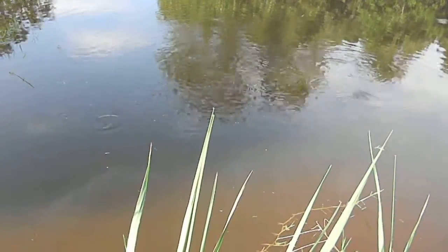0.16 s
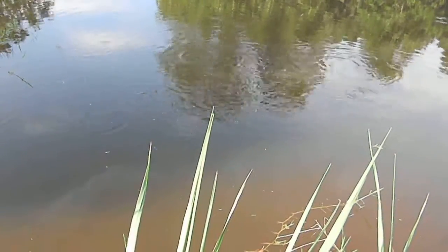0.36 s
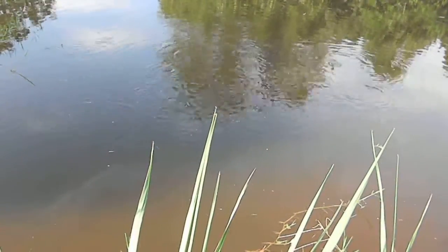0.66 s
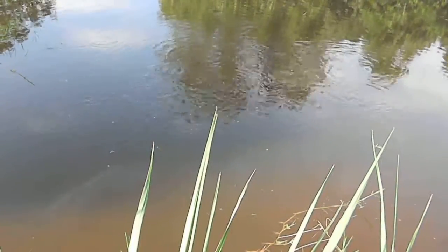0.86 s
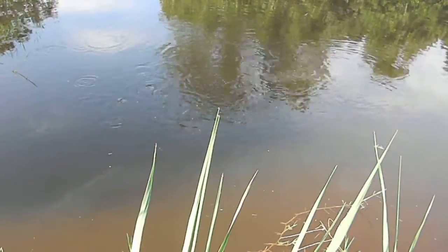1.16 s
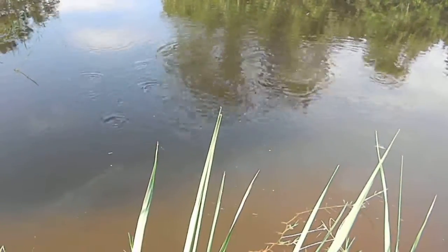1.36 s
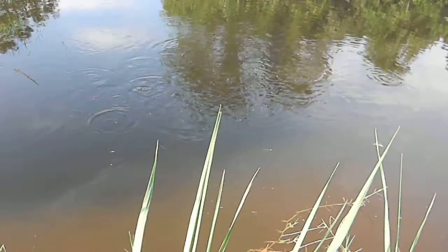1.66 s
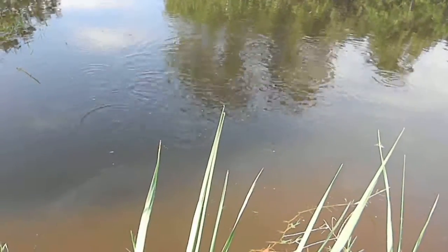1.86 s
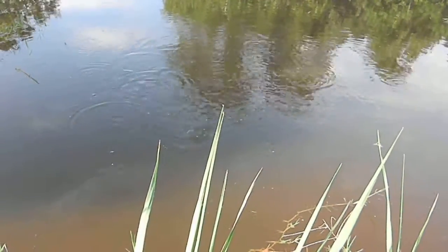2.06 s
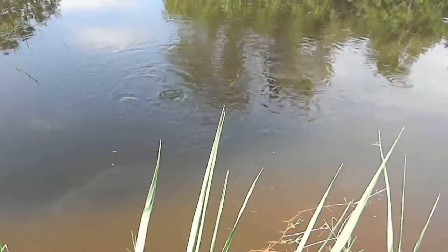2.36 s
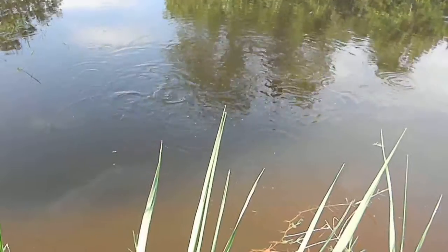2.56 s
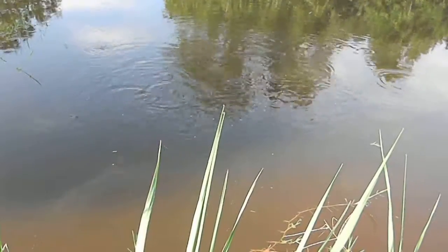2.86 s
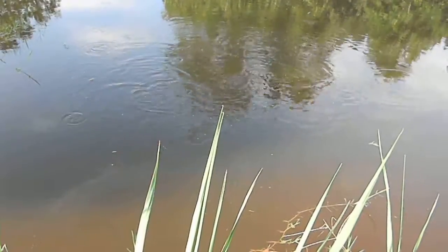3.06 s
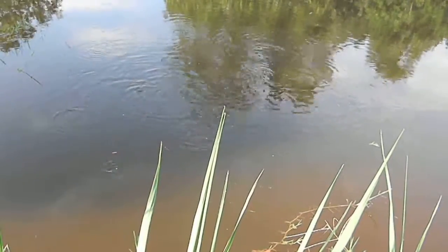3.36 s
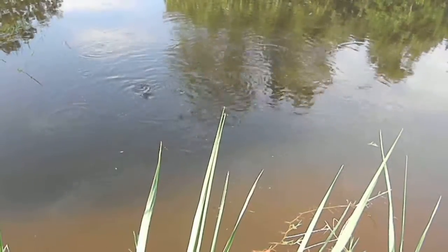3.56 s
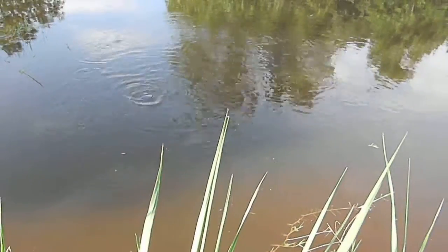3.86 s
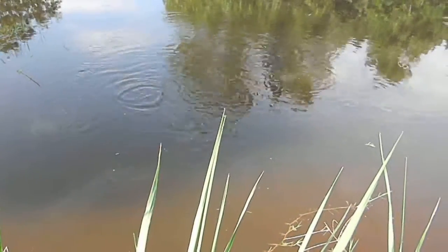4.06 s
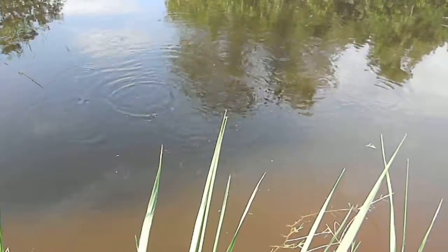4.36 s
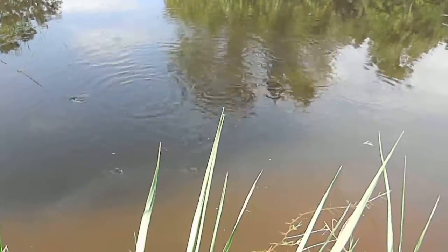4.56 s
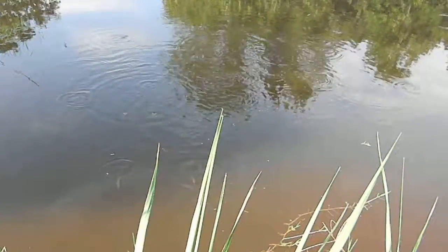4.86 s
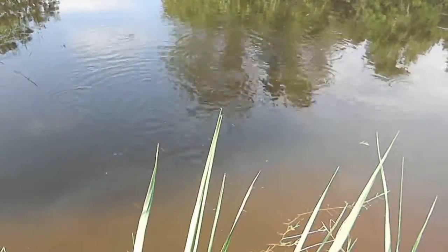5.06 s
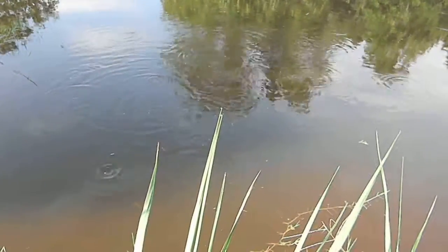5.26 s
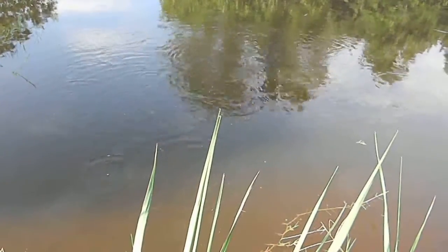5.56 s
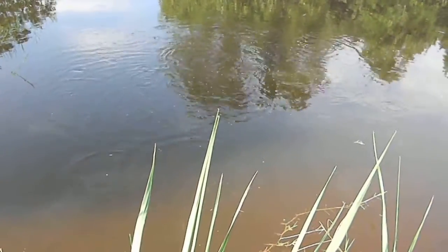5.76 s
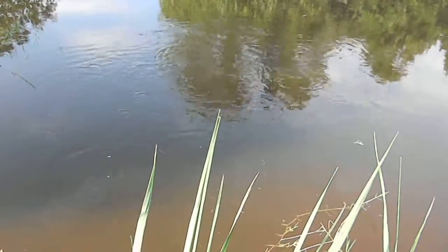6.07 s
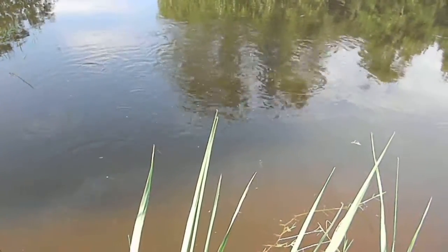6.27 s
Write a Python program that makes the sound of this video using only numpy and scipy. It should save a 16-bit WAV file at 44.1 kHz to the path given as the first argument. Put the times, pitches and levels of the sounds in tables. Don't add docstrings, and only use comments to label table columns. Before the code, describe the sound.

A dense, steady insect chorus, brightest around 3 to 9 kHz with a finer hiss above, fills the air beside a still pond; low traffic rumble swells gently near 0.8, 3 and 5.4 s. A close katydid makes very short, dry, noisy ticks at 0, 0.8, 1.65, 2.4, 3.0, 3.5, 4.0, 4.5, 5.3 and 5.8 s, while a farther one answers faintly. A soft rattle runs until 2.5 s, a fast cricket trill until 1.6 s, and slow chirps from 0.9 s onward. Small tree frogs pulse about twelve times a second throughout. Faint bird whistles glide up around 2.2 s. A thin, very high buzz swells from 2.5 to 5.3 s, then slow ticks follow. One small hard tap sounds at 3.56 s. From 4 s the chorus flutters in step; quick distant bird whistles return from 5.8 s to the end. Mono, no water sounds.

```python
import sys
import numpy as np
from scipy import signal
from scipy.fft import rfft, irfft
from scipy.io import wavfile
from scipy.ndimage import uniform_filter1d

SR = 44100
rng = np.random.default_rng(int(sys.argv[2]) if len(sys.argv) > 2 else 0)


def boost(x):
    u = np.asarray(x, float) / 20
    return 10 ** u


def int16_out(signal):
    q = np.round(np.clip(np.atleast_2d(signal).T, -1, 1) * 32767)
    wavfile.write(sys.argv[1], SR, q.astype(np.int16))


N = 282681
TIME = np.arange(N) / SR


def unit(x):
    return x / np.sqrt(np.mean(x ** 2))


def walk(rate):
    hold = int(SR / rate)
    steps = np.repeat(rng.standard_normal(N // hold + 1), hold)
    return unit(uniform_filter1d(uniform_filter1d(steps, hold), hold)[:N])


def body(x, modes):
    out = 0
    for k, (hz, width, db) in enumerate(modes):
        b, a = signal.iirpeak(hz, hz / width, fs=SR)
        ringing = signal.lfilter(b, a, signal.lfilter(b, a, x))
        out = out + (-1) ** k * boost(db) * np.sqrt(SR / width) * ringing
    return out


def teeth(rate, scatter_db):
    hit = rng.random(N) < rate / SR
    return unit(hit * rng.choice([-1, 1], N) * boost(scatter_db * rng.standard_normal(N)))


def rasp(swell, modes):
    return body(teeth(12000, 1.5) * swell, modes)


def chirp(swell, hz, wobble_hz):
    return swell * np.sin(2 * np.pi * np.cumsum(hz + wobble_hz * walk(120)) / SR)


def strokes(bouts, duty, gain_db, scatter_db, linger_s, rise_db, fall_db, slows=0):
    power = np.zeros(N)
    for first, loudest, last, rate, db in bouts:
        t = TIME - loudest
        done = rate * t - slows * t ** 2
        nearest = np.round(done)
        swell = np.cos(np.pi * np.clip((done - nearest) / duty, -.5, .5)) ** 2
        rise = -rise_db * (t / (loudest - first)) ** 2
        fall = -fall_db * (t / (last - loudest)) ** 2
        level = boost(db + gain_db + np.where(t < 0, rise, fall))
        strength = boost(scatter_db * rng.standard_normal(1024))[nearest.astype(int) % 1024]
        power += (swell * strength * level * (TIME >= first) * (TIME < last)) ** 2
    keep = np.exp(-1 / (linger_s * SR))
    lingering = signal.lfilter([1 - keep], [1, -keep], power)
    return np.sqrt(power / 2 + lingering / 2)


def ticker(events, modes, gain_db, length, tail_s, tail_db):
    gate = np.zeros(N)
    for s, db in events:
        t = TIME - s
        onset = np.clip(t / .001, 0, 1)
        push = .55 + .45 * np.sin(np.pi * np.clip(t / length, 0, 1))
        echo = boost(tail_db) * np.exp(-np.clip(t - length, 0, 1) / tail_s) * (t >= length)
        gate += boost(db + gain_db) * (onset * push * (t < length) + echo)
    return rasp(gate, modes)


# (t/s, peak level/dB)
TICKS = [
    (0.0054, -33),
    (0.8419, -32),
    (1.653, -32),
    (2.4163, -30),
    (2.9765, -30),
    (3.4844, -31),
    (4.0152, -32),
    (4.537, -31.5),
    (5.2863, -32),
    (5.7747, -30.5),
]
# (f/Hz, width/Hz, level/dB)
TICK_WING = [(7600, 900, -10), (8900, 800, 0), (10050, 900, -3), (11400, 1200, -9), (12400, 1200, -7),
             (14200, 2400, -9)]
# (t/s, peak level/dB)
ANSWERS = [
    (0.1739, -47),
    (0.7057, -44),
    (1.237, -49),
    (1.7319, -47),
    (2.292, -45),
    (2.626, -49),
    (3.075, -46),
    (3.314, -49),
    (5.5494, -51),
    (6.096, -49),
]
# (f/Hz, width/Hz, level/dB)
ANSWER_WING = [(10200, 1300, -5), (11600, 1400, -5), (12900, 1500, -2)]


def ticking_katydids():
    near = ticker(TICKS, TICK_WING, gain_db=-14.3, length=.017, tail_s=.008, tail_db=-10)
    far = ticker(ANSWERS, ANSWER_WING, gain_db=-8, length=.014, tail_s=.006, tail_db=-12)
    return near + far


# (first t/s, loudest stroke t/s, last t/s, strokes per s, level/dB)
BUZZER = [
    (2.45, 5.0599, 5.308, 62.876, -52.5),
]
# (first t/s, loudest stroke t/s, last t/s, strokes per s, level/dB)
BUZZER_TICKS = [
    (5.87, 6.1037, 6.42, 17.76, -61),
]
# (f/Hz, width/Hz, level/dB)
BUZZER_WING = [(10900, 900, -12), (12950, 600, -9), (13900, 1200, -12), (15110, 380, 0), (15620, 450, -5)]
# (first t/s, loudest stroke t/s, last t/s, strokes per s, level/dB)
RATTLER = [
    (-.05, .5131, .9, 51.6, -58),
    (.9, 1.3566, 1.68, 51.6, -58),
    (1.68, 2.1433, 2.47, 51.6, -58),
]
# (f/Hz, width/Hz, level/dB)
RATTLER_WING = [(9050, 500, 0), (11700, 1600, -8), (13600, 900, -10), (14800, 500, -12)]


def buzzing_katydids():
    buzz = strokes(BUZZER, .6, 1.2, 1.8, .0025, rise_db=20, fall_db=1.5, slows=.707)
    buzz += strokes(BUZZER_TICKS, .14, 4.5, 1.2, .002, rise_db=8, fall_db=6)
    rattle = strokes(RATTLER, .7, 3, 1.2, .005, rise_db=6, fall_db=7)
    return rasp(buzz, BUZZER_WING) + rasp(rattle, RATTLER_WING)


# (first t/s, loudest stroke t/s, last t/s, strokes per s, level/dB)
TRILLER = [
    (-.06, 1.0434, 1.62, 58.32, -53),
]
CHIRPER = [
    (.9, 1.808, 3.1, 5.59, -59),
    (3.2, 4.158, 6.45, 5.585, -58.5),
]
CHIRPER_MATE = [
    (1.9, 3.145, 3.9, 5.76, -59.5),
]


def crickets():
    trill = strokes(TRILLER, .58, 7.5, 1.8, .004, rise_db=1, fall_db=7)
    slow = strokes(CHIRPER, .28, 9.5, .8, .01, rise_db=5, fall_db=2)
    mate = strokes(CHIRPER_MATE, .26, 9, 1.5, .01, rise_db=2, fall_db=3)
    return chirp(trill, 8680, 65) + chirp(slow, 6975, 45) + chirp(mate, 7370, 45)


# (first t/s, loudest pulse t/s, last t/s, pulses per s, level/dB)
FROG_HIGH = [
    (-.1, .6103, 1.4, 13.1, -58),
    (1.4, 2.2141, 2.85, 13.0, -60),
    (2.85, 3.1038, 3.55, 13.0, -60),
    (3.55, 4.0759, 4.36, 12.55, -62),
]
FROG_NEXT = [
    (4.36, 5.408, 6.6, 12.88, -61),
]
FROG_MID = [
    (.05, 1.146, 2.35, 11.87, -57),
    (2.4, 2.6417, 3.15, 12.3, -61),
    (3.15, 3.8712, 4.15, 12.15, -61),
]
FROG_LOW = [
    (1.2, 1.652, 2.3, 12.3, -63),
    (2.3, 2.7131, 3.0, 12.5, -64),
    (3.0, 3.7087, 4.45, 12.45, -59),
    (4.45, 5.1254, 5.7, 12.78, -63),
    (5.7, 6.2191, 6.6, 12.6, -61),
]
# (f/Hz, width/Hz, level/dB)
HIGH_SAC = [(5225, 380, -0.5), (4810, 290, -6), (5920, 520, 6.5)]
MID_SAC = [(3740, 200, -5), (4060, 120, -14)]
LOW_SAC = [(2350, 250, -9), (2720, 260, -1), (3100, 350, -4)]


def frogs():
    high = strokes(FROG_HIGH, .28, 5, 1, .012, rise_db=4, fall_db=5)
    mid = strokes(FROG_MID, .55, 4.5, 1.2, .018, rise_db=9, fall_db=6)
    low = strokes(FROG_LOW, .5, 2.5, 1.2, .012, rise_db=3, fall_db=3.5)
    after = strokes(FROG_NEXT, .25, 5, 1, .006, rise_db=1, fall_db=3)
    tones = boost(5.0) * chirp(after, 5380, 91.1) + boost(6.5) * chirp(high, 5600, 40.3)
    tones += boost(2.5) * chirp(mid, 3652, 25.4) + boost(-19.0) * chirp(low, 2736, 30.25)
    rasps = boost(-8.5) * rasp(high + after, HIGH_SAC)
    rasps += boost(-4.5) * rasp(mid, MID_SAC) + boost(-3.0) * rasp(low, LOW_SAC)
    return tones + rasps


# (f/Hz, t60/s, level/dB)
KNOCK_MODES = [(2056, .028, -3), (1850, .007, -1), (2350, .007, -4)]
KNOCK_S, KNOCK_DB, KNOCK_RISE_S = 3.563, -40, .00025


def knock():
    t = np.clip(TIME - KNOCK_S, 0, 1)
    rise = 1 - np.exp(-t / KNOCK_RISE_S)
    ring = np.zeros(N)
    for hz, t60, db in KNOCK_MODES:
        decay = np.exp(-np.log(1000) * t / t60)
        ring += boost(db) * decay * np.sin(2 * np.pi * hz * t) * rise * (t < 1)
    return boost(KNOCK_DB) * ring


# (t/s, length/s, start f/Hz, end f/Hz, level/dB)
NOTES = [(1.05, .12, 4000, 4150, -63), (2.175, .11, 2250, 3650, -62), (2.255, .115, 3580, 4290, -56),
         (2.39, .08, 2300, 2280, -65), (5.783, .065, 3540, 3930, -52), (5.835, .095, 3950, 4370, -55),
         (5.965, .024, 2850, 3200, -53), (6.035, .035, 4250, 3900, -55), (6.1, .04, 2350, 2310, -59),
         (6.12, .03, 2620, 2670, -57), (6.165, .025, 2350, 2330, -62), (6.21, .025, 2750, 3200, -54),
         (6.226, .03, 3200, 2900, -55), (6.28, .035, 3900, 4100, -57), (6.345, .06, 2330, 2290, -57),
         (6.37, .04, 2700, 2640, -59)]
NOTE_LEAN = .6
GLIDE_BEND = 1.6


def bird(wobble_hz, flutter_db):
    song = np.zeros(N)
    wobble = wobble_hz * walk(320)
    for s, length, hz0, hz1, db in NOTES:
        start = int(s * SR)
        u = np.arange(min(int(length * SR), N - start)) / (length * SR)
        span = slice(start, start + len(u))
        hz = hz1 + (hz0 - hz1) * (1 - u) ** GLIDE_BEND
        phase = 2 * np.pi * np.cumsum(hz + wobble[span]) / SR
        swell = np.sin(np.pi * u ** NOTE_LEAN) ** .48
        song[span] += boost(db) * 1.55 * swell * np.sin(phase)
    return song * boost(flutter_db * walk(90))


def scatter(x, t60_s, db):
    t = TIME[:SR // 2]
    echo = rng.standard_normal(len(t)) * np.exp(-np.log(1000) * t / t60_s)
    return x + boost(db) * signal.fftconvolve(x, echo / np.linalg.norm(echo))[:N]


def crowd(spectrum, flicker_db, rate):
    hz, db = np.transpose(spectrum)
    octave = np.log2(np.fft.rfftfreq(N, 1 / SR) + 1)
    colour = boost(np.interp(octave, np.log2(hz), db)) * rfft(rng.standard_normal(N))
    total = np.zeros(N)
    for centre in np.arange(np.log2(hz[0]), np.log2(hz[-1]) + .5, .5):
        band = irfft(colour * np.clip(1 - 2 * abs(octave - centre), 0, 1), N)
        total += band * boost(flicker_db * walk(rate))
    return unit(total)


# (f/Hz, level/dB per Hz)
TREES = [(1120, -40), (1900, -27.5), (2400, -11.5), (2660, -6), (2890, -6.5), (3550, -2), (4020, -3),
         (4570, -11.5), (5510, -1), (6540, -5), (7150, -0.5), (7650, 2), (8430, 0), (9800, -9),
         (12700, -29), (21600, -120)]
# (first t/s, deepest gap t/s, last t/s, gaps per s, depth level/dB under full silence)
GAPS = [
    (4.0, 5.468, 6.8, 12.88, -5),
    (4.0, 5.468, 6.8, 38.64, -11),
]
TREES_DB, TREES_FADE_DB_PER_S = -46.5, .11
IN_STEP_HZ = 6200


def tree_chorus():
    trees = boost(TREES_DB - TREES_FADE_DB_PER_S * TIME) * crowd(TREES, .59, 12)
    in_step = signal.sosfiltfilt(signal.butter(4, IN_STEP_HZ, fs=SR, output="sos"), trees)
    gaps = strokes(GAPS, .4, 0, 1, .001, rise_db=4, fall_db=3)
    return trees + in_step * (.12 * (TIME > GAPS[0][0]) - gaps)


# (f/Hz, level/dB per Hz)
GRASS = [(5300, -33), (9000, -9), (10800, -4), (12600, -1), (13500, -4), (14000, -9), (15000, -10),
         (15800, -11)]


def grass_hiss():
    return boost(-56.5) * crowd(GRASS, .88, 26)


# (f/Hz, level/dB per Hz)
RUMBLE = [(12, -34), (20, -16.5), (65, -1.5), (98, 0.5), (140, -3.5), (212, -8.5), (340, -22.5), (523, -23),
          (663, -28), (856, -26), (1020, -32), (1350, -35), (1920, -38), (2200, -37), (2860, -54),
          (4840, -120)]
# (t/s, swell level/dB)
PASSES = [
    (.8, 1.5),
    (3.0, 2.5),
    (5.4, 1),
]
ROAD_DB, PASS_S = -42, .72


def traffic():
    rumble = crowd(RUMBLE, .88, 2.976)
    deep = signal.sosfiltfilt(signal.butter(2, 230, fs=SR, output="sos"), rumble)
    swell_db = sum(db / (1 + ((TIME - s) / PASS_S) ** 2) for s, db in PASSES)
    return boost(ROAD_DB + swell_db) * deep + boost(-41) * (rumble - deep)


def scene():
    near = ticking_katydids() + buzzing_katydids() + crickets() + frogs() + knock()
    song = scatter(bird(wobble_hz=65, flutter_db=1.5), t60_s=.2, db=-6)
    mono = near + song + tree_chorus() + grass_hiss() + traffic()
    return np.array([mono, mono])


def low_pass(x):
    return signal.sosfilt(signal.butter(12, 15750, fs=SR, output="sos"), x)


def record(dry):
    top = signal.ellip(10, .2, 70, 15760, fs=SR, output="sos")
    mix = signal.sosfilt(top, dry)
    return low_pass(mix)


dry = scene()
out = record(dry)
int16_out(out)
```